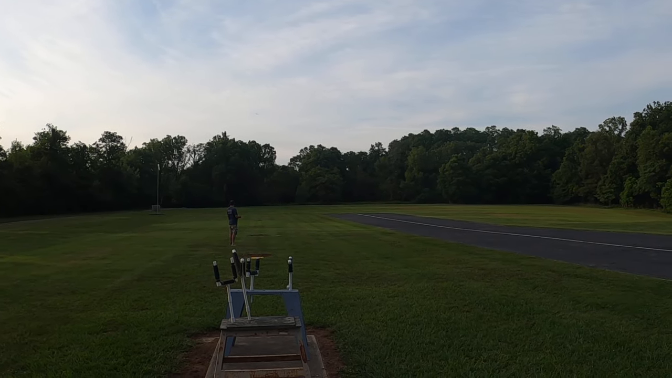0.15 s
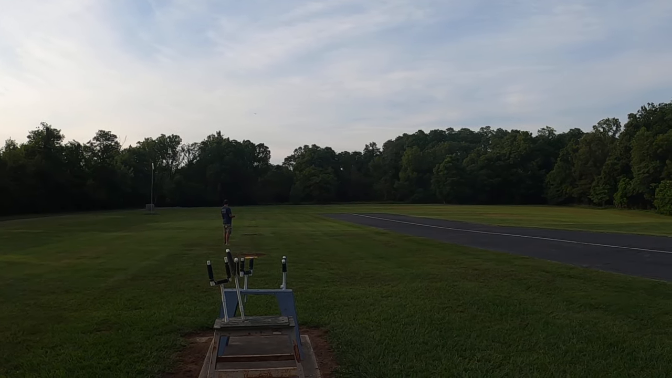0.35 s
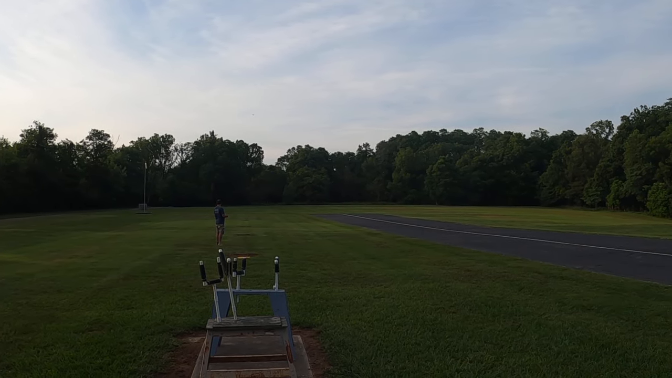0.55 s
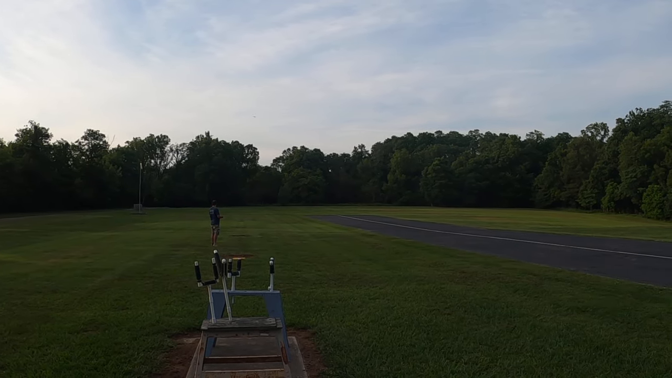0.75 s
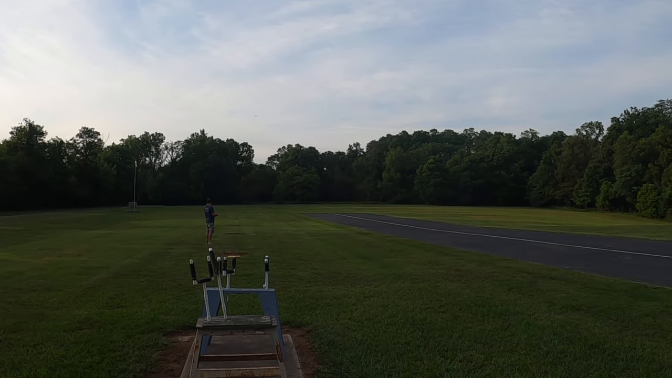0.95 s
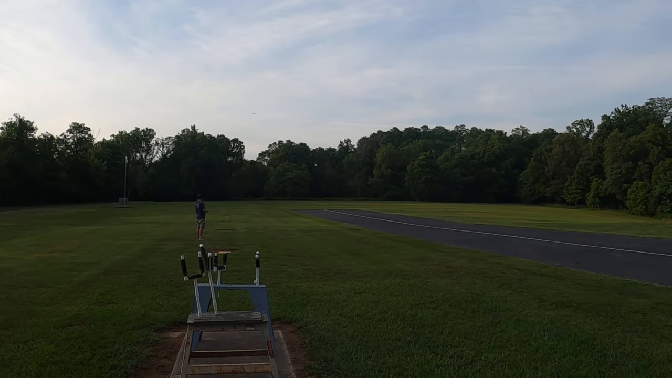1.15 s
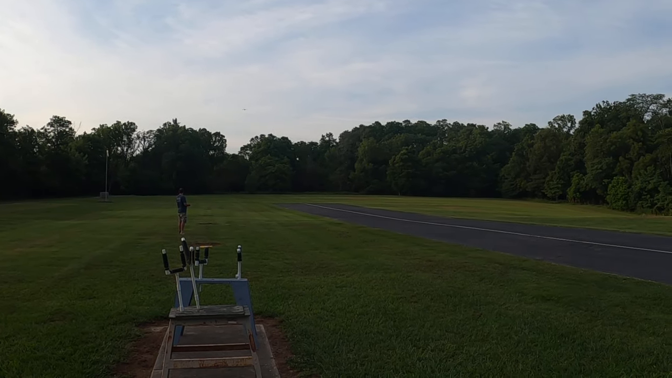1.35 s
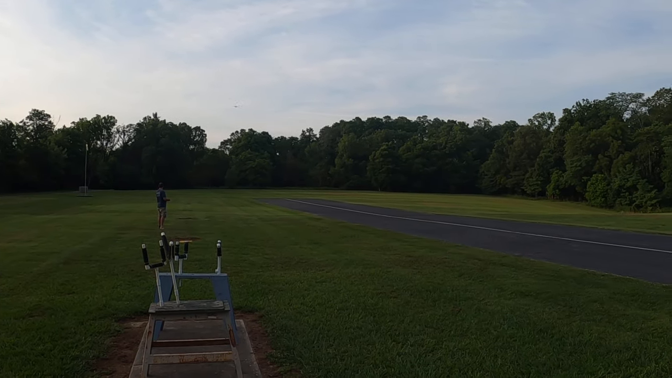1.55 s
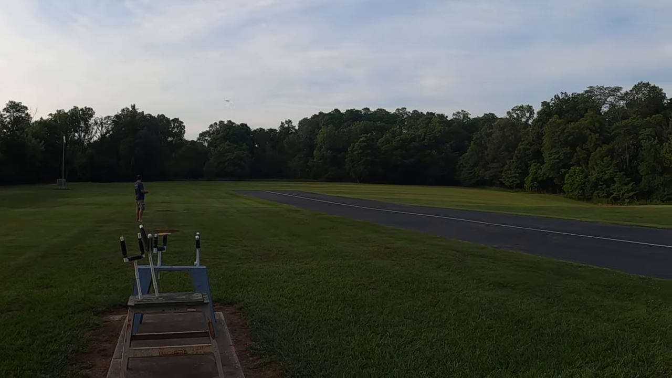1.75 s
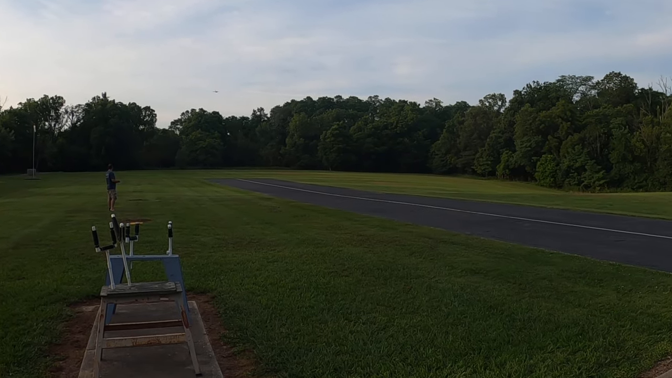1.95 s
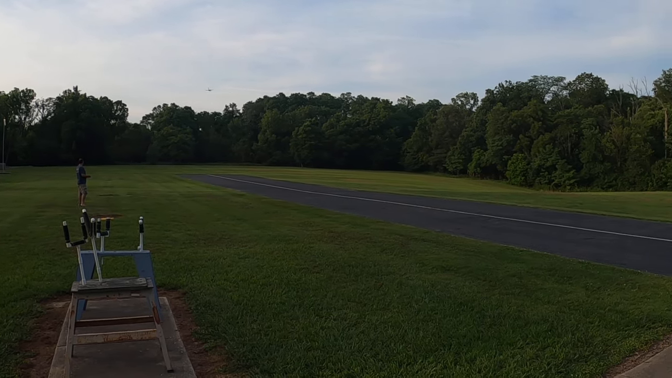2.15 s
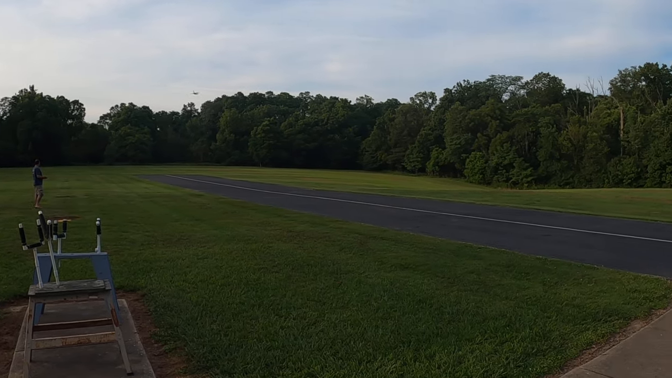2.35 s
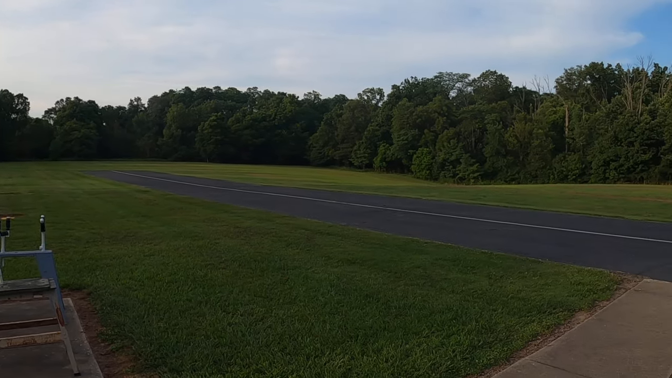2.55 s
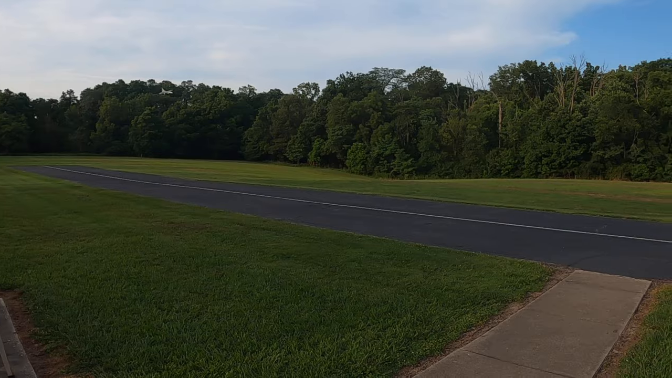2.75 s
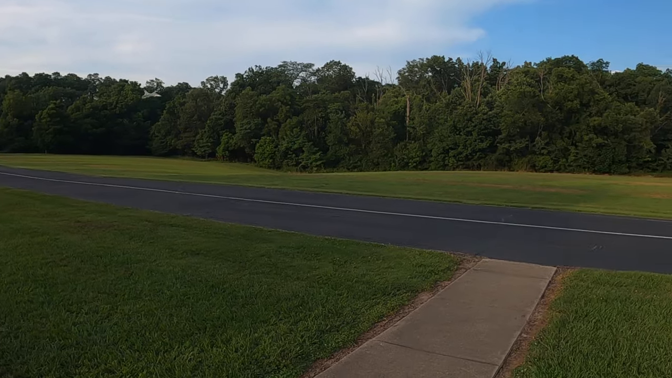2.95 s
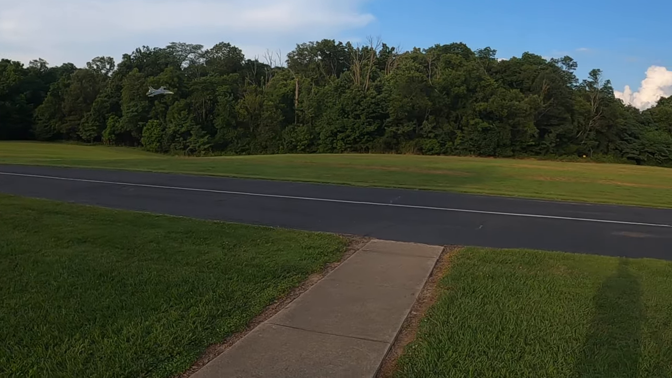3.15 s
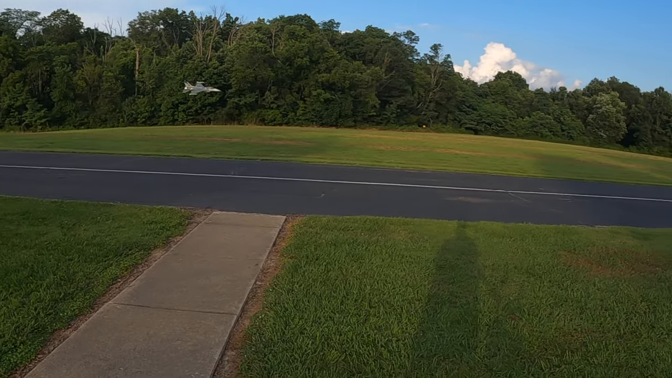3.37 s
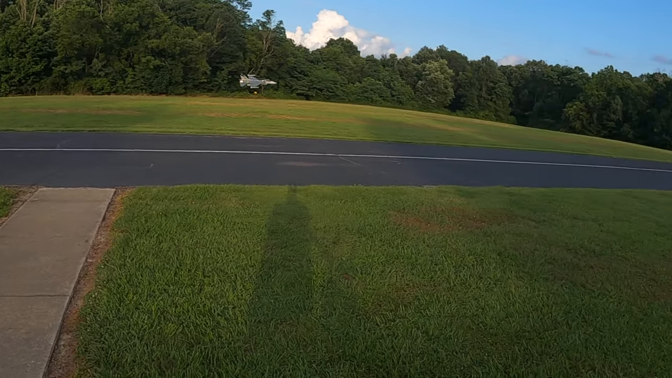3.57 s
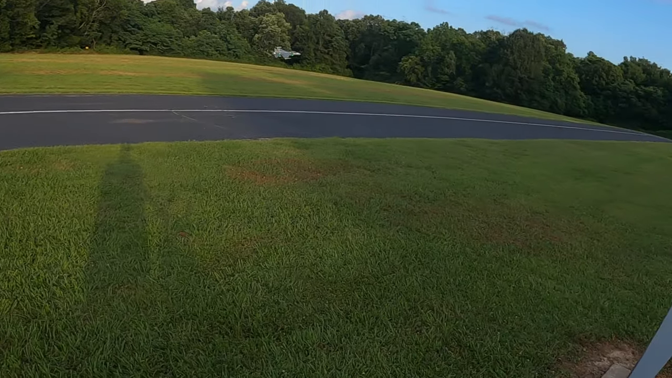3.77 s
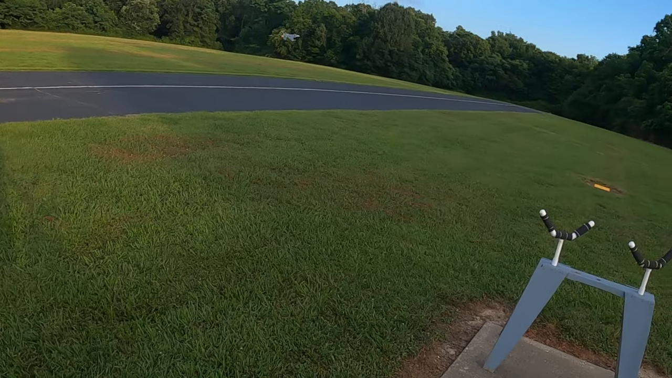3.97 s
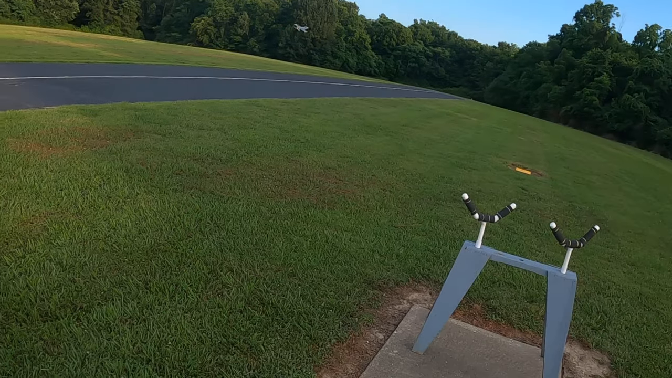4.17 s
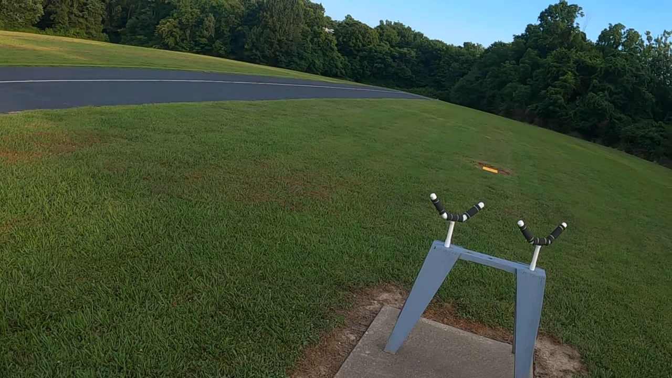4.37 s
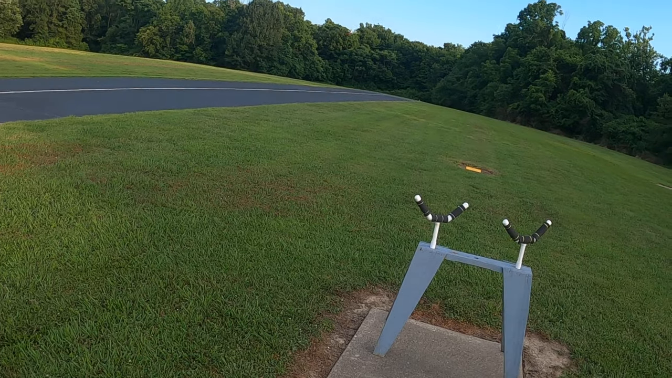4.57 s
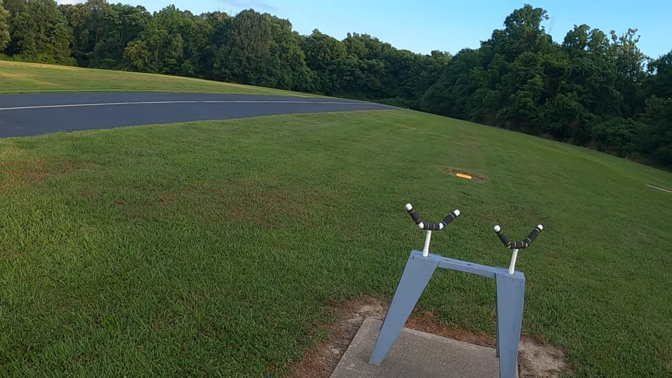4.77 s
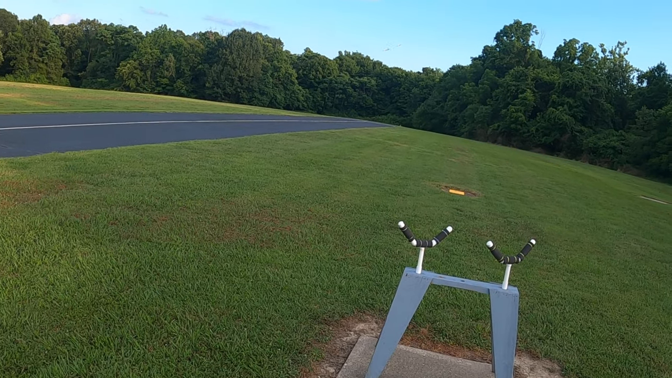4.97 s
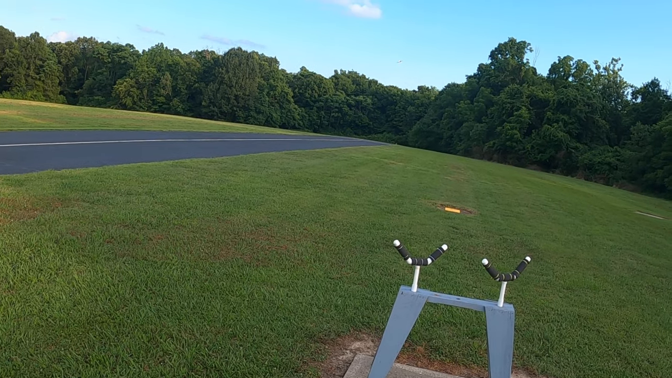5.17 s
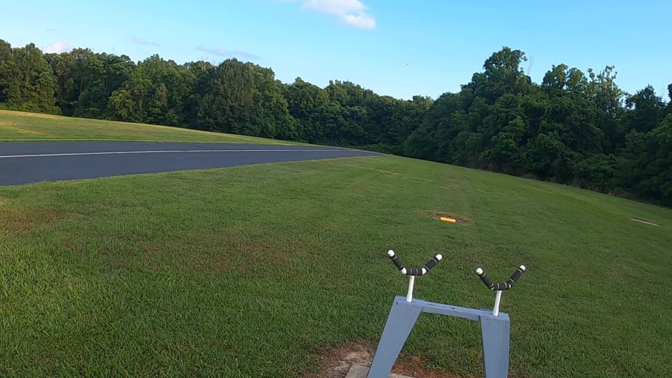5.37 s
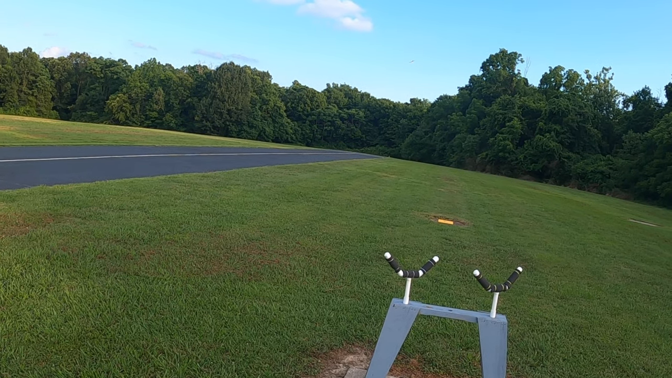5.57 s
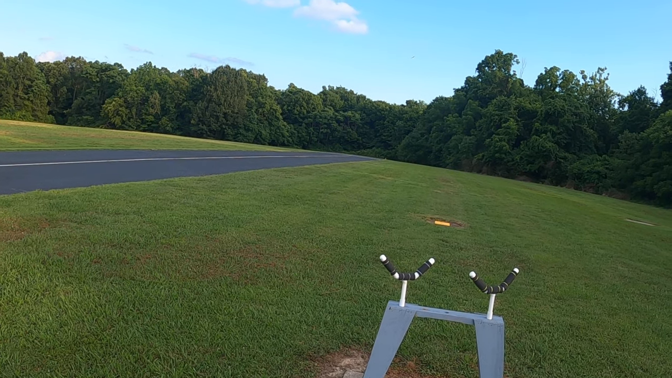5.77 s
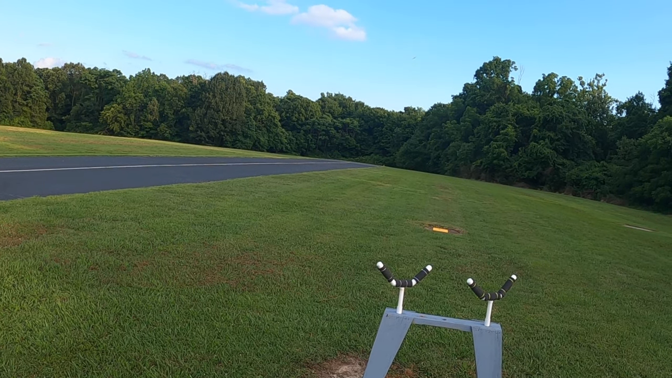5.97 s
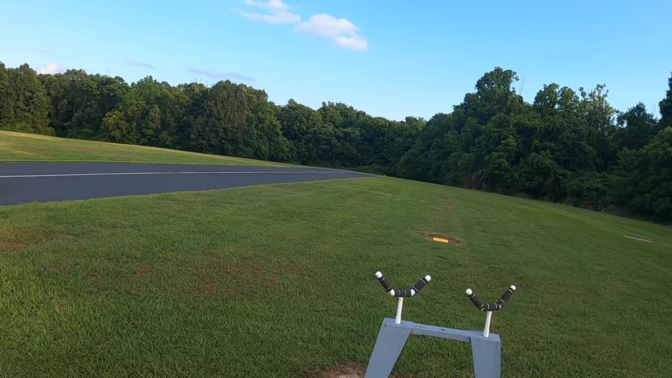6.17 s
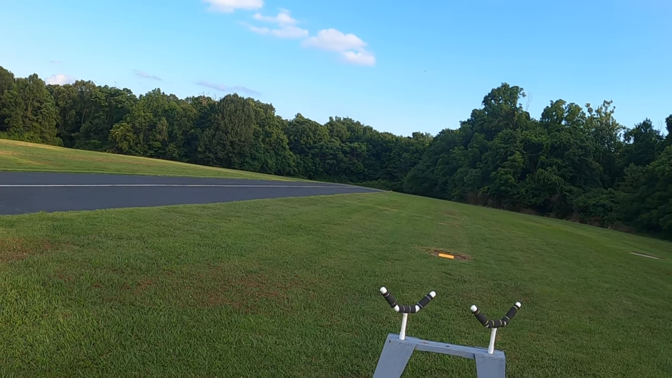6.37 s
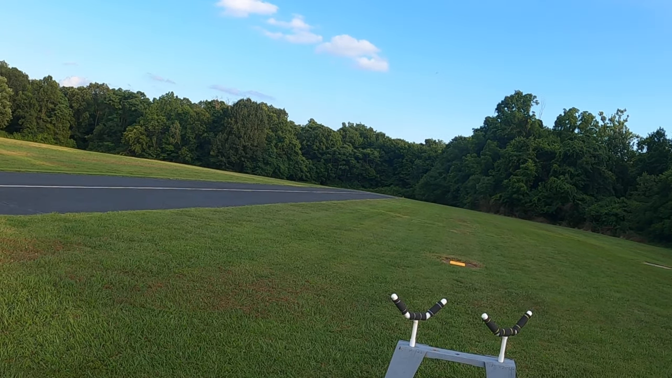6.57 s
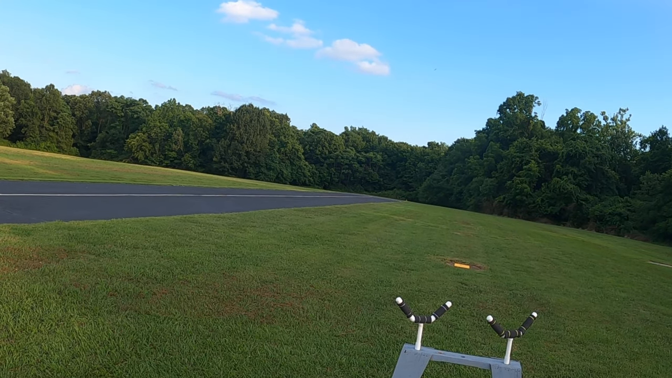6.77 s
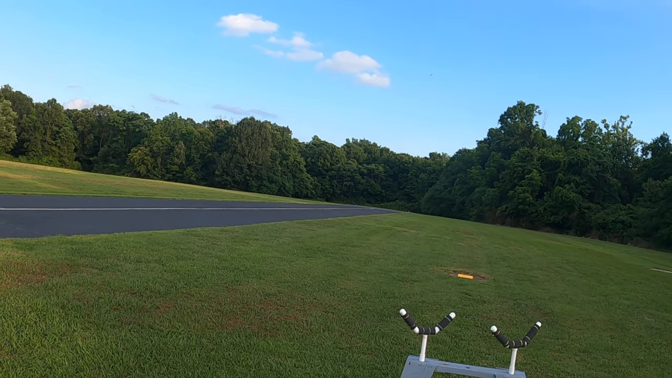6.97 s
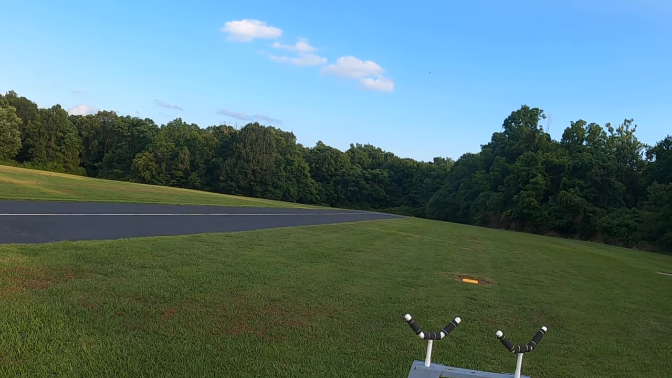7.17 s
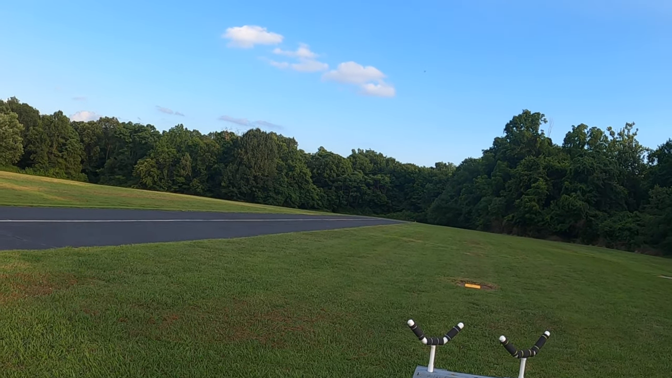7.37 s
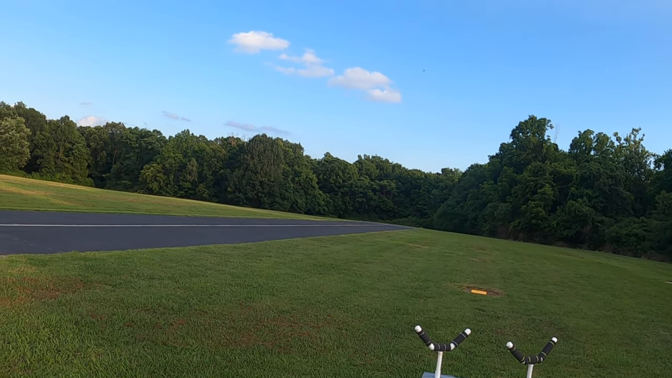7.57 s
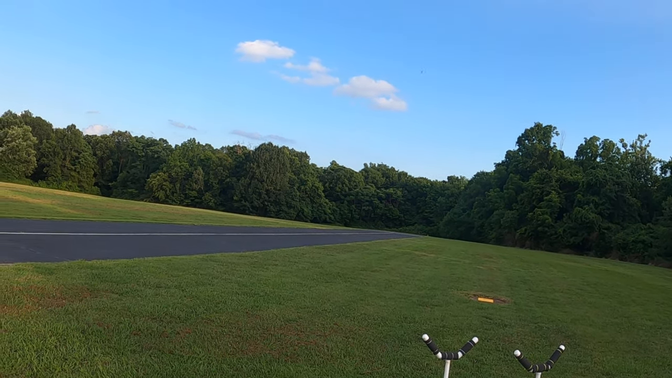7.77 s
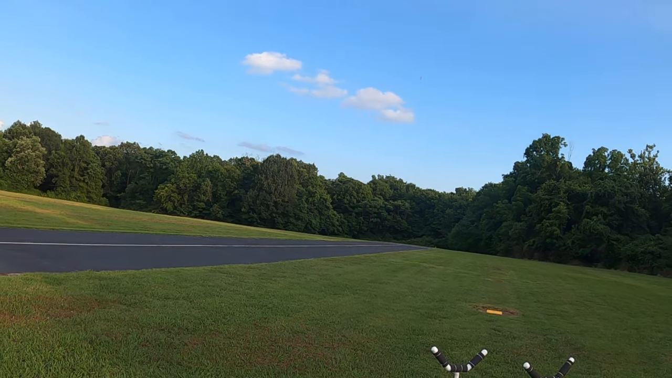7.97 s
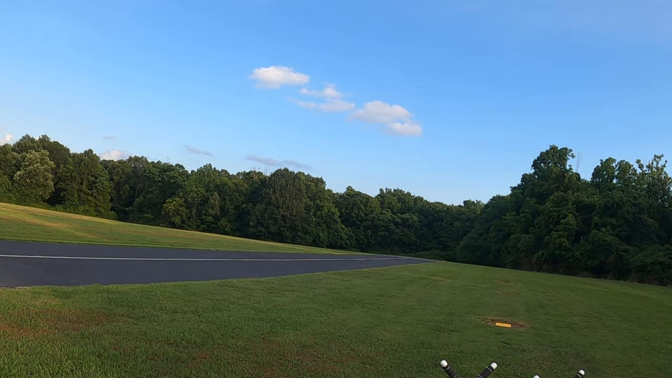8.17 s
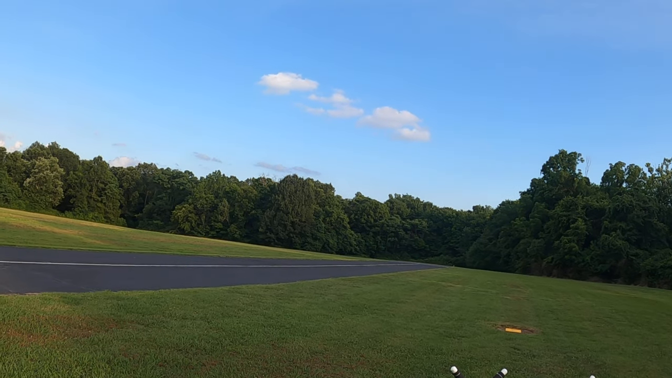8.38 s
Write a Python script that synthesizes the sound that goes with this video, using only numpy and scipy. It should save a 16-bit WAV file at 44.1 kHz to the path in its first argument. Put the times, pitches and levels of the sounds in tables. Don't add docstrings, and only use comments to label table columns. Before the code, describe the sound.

An open grass field, heard through a handheld stereo microphone, with low distant traffic and light wind buffeting. In the first half second a small electric fan spools up faintly, becoming a thin steady whine around 6.5 kHz that pulses in and out over soft, patchy air rush. A tiny bird chip sounds near 1.6 s. From about 2.8 s the jet closes fast: the whine sharpens, a lower shaft hum and hollow intake howl join, and the rush brightens. The pass peaks around 3.5-3.9 s, the whine sliding down towards 5 kHz while a hollow whistle sweeps through the hissing air. From 4 to 5 s it turns rougher and flutters away, fading almost completely by 6.3 s. A faint smeared whine and dull rush linger to 8.4 s, with wind thumps near 3.4, 5.5, 6.1 and 7.1 s and a faint low bird whistle at 7.6 s.

```python
import sys
import numpy as np
from scipy import signal
from scipy.fft import rfft, irfft, next_fast_len
from scipy.io import wavfile
from scipy.ndimage import map_coordinates

SR = 44100
rng = np.random.default_rng(int(sys.argv[2]) if len(sys.argv) > 2 else 0)


def magnitude_from_level(level_db):
    exponent = np.asarray(level_db, float) / 20
    return 10 ** exponent


def generate_wav(sig):
    pcm = np.round(np.clip(np.atleast_2d(sig).T, -1, 1) * 32767).astype(np.int16)
    wavfile.write(sys.argv[1], SR, pcm)


N = 371763

# time in seconds, level in dB, treble the air leaves in dB.
JET_DISTANCE = [(0, -51, -18.5), (.3, -48, -23.5), (.65, -42.5, -22.5), (1.5, -40, -26), (1.8, -37, -22),
                (2.35, -36.5, -13), (2.9, -32, -12.5), (3.5, -28.5, -9), (3.8, -29.5, -7), (4, -33, -4),
                (4.7, -34.5, -4.5), (5.25, -38, -10), (5.9, -39.5, -16.5), (6.3, -43, -16),
                (7.2, -44.5, -17.5), (7.8, -44, -20), (8.43, -48, -16)]
# time in seconds, treble gain in dB, half length in seconds.
CALM_POCKETS = [(1.176, 12, 0.38), (1.88, 7, 0.15), (2.907, 7, 0.036), (6.005, 7, 0.09), (6.35, 7.5, .05),
                (6.524, 3, 0.1), (6.908, 1, 0.13), (7.42, 4, .08), (4.608, 1.5, 0.034), (6.73, -3, 0.087),
                (8.15, -1, 0.077), (7.594, 3, 0.056), (7.862, 10.5, 0.13), (8.43, 10, 0.15)]
# frequency in Hz, density in dB per Hz.
RUSH_COLOUR = [(110, -5), (300, -9), (750, -3.5), (1000, -0.5), (1500, -3), (2300, -5.5), (2900, -7),
               (4500, -3.5), (5600, -2), (6800, -3.5), (7600, -13), (8400, -9.5), (10200, -19),
               (10900, -24), (12400, -26.5), (14000, -33), (15400, -58)]
# time in seconds, share of full fan speed from 0 to 1.
THROTTLE = [
    (.28, .83),
    (.45, .933),
    (.58, 1),
]
# time in seconds, level in dB rms.
WHINE_LEVEL = [(0, -72), (.3, -56), (.5, -55), (1.25, -40), (1.55, -51.5), (2.1, -39), (2.8, -39.5),
               (3.1, -26), (3.55, -26), (3.7, -19.5), (4.03, -24), (4.15, -35), (4.25, -26.5), (4.4, -33.5),
               (4.6, -30), (4.75, -36.5), (5.3, -36.5), (6.3, -58)]
# time in seconds, echo share from 0 to 1.
WHINE_NULLS = [(0, .3), (.3, .5), (.6, .4), (.9, .6), (1.43, .8), (1.63, .8), (2.01, .4), (2.28, .7),
               (2.5, .4), (2.78, .9), (2.86, .7), (2.93, .85), (3.18, .9), (3.35, .8), (3.455, .9),
               (3.525, .95), (3.625, .95), (3.74, .95), (3.85, .8), (4.085, .95), (4.225, .5), (4.32, .95),
               (4.52, .9), (4.72, .6), (4.95, .5), (5.2, .2), (5.85, .6), (6.12, .8), (6.3, .5)]
# time in seconds, lag in ms.
ECHO_LAG = [(.1, 1.85), (1.6, 1.85), (2.2, 1.72), (2.8, 1.6), (3.2, 1.44), (3.5, 1.15), (3.8, .7),
            (3.92, .61), (4.2, .58), (4.4, .76), (4.7, 1.04), (5, 1.29), (5.4, 1.58), (6, 1.96),
            (6.5, 2.25), (7.25, 2.6), (8, 2.98), (8.4, 3.2)]
# frequency in Hz, likeness from 0 to 1, left-right in dB, left lead in radians.
PORT_RESPONSE = [(98, 0.65, -4, 0), (288, 1, 2, -0.26), (1290, 0.8, -1, 0), (3780, 1, 3, -.5),
                 (6370, 0.88, -1, -0.7), (7520, 0.87, 5.5, -2), (8000, 1, -7.5, -0.5),
                 (13000, 1, -10, -1.5), (15500, .3, -35, 18)]
# time in seconds, left-right in dB, left lag in samples.
CAMERA_TURN = [(0, 1.5, 0.76), (1, 2, 0.49), (3.3, 2.5, .2), (4.3, 1, 0.27), (5.3, -1, 1.22),
               (6.2, -1.3, 1.27), (8.43, -1, 1.27)]
# frequency in Hz, density in dB per Hz.
WIND_TONE = [(8.8, -33), (15, 4), (38, 4), (55, 3), (99, -7), (231, -34.5), (400, -46), (520, -81),
             (880, -120)]
# time in seconds, level in dB, left-right in dB, half length in seconds.
GUST_SWELLS = [(0, -43, 8, 0.033), (0.65, -37.5, 9, 0.057), (0.904, -38.5, -3, 0.052),
               (1.302, -33, -2, 0.024), (1.5, -42, 2, .2), (1.977, -35, -2, 0.089), (2.15, -43, -1, 0.16),
               (2.578, -44.5, 5, 0.075), (3.007, -43, 12, .04), (3.29, -35, 20, 0.044),
               (3.438, -26.5, 13, .05), (3.56, -33, 18, 0.054), (3.79, -36, 23, 0.044),
               (3.98, -37.5, -4, 0.029), (4.302, -33.5, -4, 0.038), (4.5, -44.5, -12, 0.11),
               (5.393, -43, -16, 0.046), (5.558, -31.5, -20, 0.057), (5.99, -36, -8, 0.055),
               (6.09, -31.5, -3, 0.047), (6.298, -43, -2, 0.087), (6.577, -34, 12, 0.083),
               (7.117, -38.5, -2, .12), (7.3, -42, 10, 0.1), (7.516, -39, 0, 0.054),
               (7.68, -37.5, 9, 0.058), (8.05, -45, -2, 0.21)]
# start in seconds, peak in dB, left-right in dB, frequency in Hz.
GUST_THUMPS = [(3.276, -20, 17, 80), (3.432, -23, 8, 43.1), (5.368, -26.5, -16, 43.1),
               (5.507, -25, -15, 68), (5.963, -32, -13.5, 110), (6.082, -23, 8, 81), (6.101, -19, -27, 55),
               (6.488, -38.5, 13.5, 73.6), (6.642, -37, 3, 79.4), (7.076, -21.5, -26, 60),
               (7.668, -29, 16, 86.5)]
# frequency in Hz, density in dB per Hz.
FIELD_COLOUR = [(29, -15), (50, 6.5), (176, -14.5), (255, -11.5), (420, -14), (773, -23.5), (1360, -5.5),
                (3240, -27), (5460, -24), (9000, -59), (11700, -81), (19800, -120)]
# start in seconds, length in seconds, start in Hz, end in Hz, level in dB, half the left-
# right difference in dB.
BIRD_NOTES = [
    (.02, 0.14, 4470, 4400, -58, 2),
    (1.575, 0.033, 4240, 4120, -43, 5),
    (7.268, .04, 4200, 4200, -54, 9),
    (7.62, 0.28, 2590, 2490, -54.5, 11),
]

BLADES, POLE_PAIRS = 11, 7
ABEAM_S, ABEAM_SPREAD_S = 3.72, .455


def clock():
    return np.arange(N) / SR


def in_time(rows):
    s, *columns = np.transpose(rows)
    return [np.interp(clock(), s, c) for c in columns]


def at_hz(rows, hz, order=1):
    rows = np.array(rows)
    return np.interp(np.log(hz + 1), np.log(rows[:, 0]), rows[:, order])


def rms_one(x):
    return x / np.sqrt(np.mean(x ** 2) + 1e-20)


def shaped(x, response):
    size = next_fast_len(N + 4096)
    hz = np.arange(size // 2 + 1) * SR / size
    return irfft(rfft(x, size) * response(hz), size)[..., :N]


def band(x, low_hz, high_hz):
    return signal.sosfilt(signal.butter(2, [low_hz, high_hz], "band", fs=SR, output="sos"), x)


def delayed(x, lag):
    read_at = [np.arange(N) - lag]
    return np.array([map_coordinates(c, read_at, order=3, mode="nearest") for c in np.atleast_2d(x)])


def drift(rate_hz):
    r = np.exp(-2 * np.pi * rate_hz * 40 / SR)
    noise = rng.standard_normal(N // 40 + 2002)
    slow = signal.lfilter([1], [1, -2 * r, r * r], noise)[2000:]
    return np.interp(np.arange(N) / 40, np.arange(len(slow)), rms_one(slow))


def noisy_line(phase, width_hz):
    low_pass = signal.butter(2, width_hz / 2, fs=SR, output="sos")
    slow = signal.sosfilt(low_pass, rng.standard_normal((2, 2, N)))
    return rms_one(slow[0] * np.sin(phase) + slow[1] * np.cos(phase))


def bump(s, half_s):
    return np.exp(-((clock() - s) / half_s) ** 2)


def beam(s, peak_db, rise, fall, floor_db):
    late = clock() - s
    return magnitude_from_level(peak_db + np.minimum(rise * late, -fall * late)) + magnitude_from_level(floor_db)


def split(pan_db):
    return 2 * np.array([magnitude_from_level(pan_db), np.ones_like(pan_db)]) / np.sqrt(1 + magnitude_from_level(pan_db) ** 2)


def astern():
    along = (clock() - ABEAM_S) / ABEAM_SPREAD_S
    return .5 + .5 * along / np.sqrt(1 + along ** 2)


def clear_db():
    return sum(gain_db * bump(s, half_s) for s, gain_db, half_s in CALM_POCKETS)


def layers_db():
    level_db, treble_db = in_time(JET_DISTANCE)
    calm_db = clear_db()
    roar_db = level_db - 0.11 * calm_db
    whoosh_db = -1.5 + 0.25 * treble_db + 6 * astern() + 0.65 * calm_db
    return roar_db, whoosh_db, treble_db + calm_db


def rush(patchy_db):
    roar_db, whoosh_db, hiss_db = layers_db()
    together = drift(9.7)
    edges = 60 * 2 ** np.arange(0, 8.4, .5)
    white = rng.standard_normal((2, 2, N))
    out = 0
    for k, (low, high) in enumerate(zip(edges, edges[1:])):
        hz = np.sqrt(low * high)
        hissy = np.clip(np.log2(hz / 4000) / 1.02, 0, 1.55)
        whooshy = np.clip(np.log2(hz / 1200), 0, 1) * max(1 - hissy, 0)
        tilt_db = whooshy * (whoosh_db + 1.5) + hissy * (hiss_db + 10.5)
        flicker_db = patchy_db * (together * (0.13 * hissy + 0.83) + 0.81 * drift(5.3))
        out = out + magnitude_from_level(roar_db + tilt_db + flicker_db) * band(white[k % 2], low, high)
    return magnitude_from_level(10) * shaped(out, lambda hz: magnitude_from_level(at_hz(RUSH_COLOUR, hz)))


def blade_hz():
    steady_hz = 5684 + 26.7 * (clock() - ABEAM_S)
    mach = .1478
    return in_time(THROTTLE)[0] * steady_hz / (1 + mach * (2 * astern() - 1))


def swell():
    s, share = np.transpose(WHINE_NULLS)
    slip = np.interp(clock(), s, np.arange(len(s)))
    share = np.clip(np.interp(clock(), s, share), 0, 1)
    both = np.abs(1 - share * np.exp(2j * np.pi * slip)) / (1 + share)
    sounding = (clock() > s[0]) * (clock() < s[-1])
    return magnitude_from_level(in_time(WHINE_LEVEL)[0]) * both ** .7 * sounding


def fan():
    roar_db, whoosh_db, hiss_db = layers_db()
    turns = 2 * np.pi * np.cumsum(blade_hz()) / SR / BLADES
    whine = swell()
    tone = whine * np.sin(BLADES * turns + 0.3 * drift(40))
    octave = beam(3.85, -53, rise=22, fall=13, floor_db=-99) * noisy_line(2 * BLADES * turns, width_hz=62)[0]
    shaft_beam = beam(3.3, -35, rise=20, fall=150, floor_db=-67)
    shaft = shaft_beam * magnitude_from_level(2.0 * drift(5)) * np.sin(turns + .4 * drift(8))
    motor = beam(3.55, -41, rise=17, fall=110, floor_db=-85) * noisy_line(POLE_PAIRS * turns, width_hz=77)[0]

    boom_intake = beam(3.1, -42, rise=40, fall=30, floor_db=-66)
    boom_side = beam(3.65, -38, rise=70, fall=28, floor_db=-80)
    boom = (boom_intake + boom_side) * noisy_line(.6 * turns, width_hz=65)[0]

    howl_db = roar_db - 9.5 - 14 * astern() + 6.5 * bump(3.23, 0.15)
    howl = magnitude_from_level(howl_db) * noisy_line(4.3 * turns, width_hz=300)[0]
    exhaust_rumble = rms_one(band(rng.standard_normal(N), 160, 230))
    efflux = beam(3.5, -41, rise=70, fall=26, floor_db=-80) * exhaust_rumble

    blur_beam = np.minimum(beam(4.2, 1.5, rise=3.0, fall=40, floor_db=-22), 1.1)
    blur = magnitude_from_level(roar_db + whoosh_db) * blur_beam * noisy_line(BLADES * turns, width_hz=650)
    wake_beam = beam(4.22, 1.0, rise=55, fall=22, floor_db=-60)
    blur = blur + whine * wake_beam * noisy_line(BLADES * turns, width_hz=400)
    return howl + efflux + np.sqrt(2) * (tone + octave) + shaft + motor + boom, blur


def ground_echo(x):
    dull = np.interp(clock(), (3.3, 3.72, 4.1, 4.75), [1, 0, 0, 1])
    paving_turn, grass_turn, grazing_turn = 1.15, -2.2, -1.15
    grass_turn = grazing_turn + (grass_turn - grazing_turn) * bump(ABEAM_S, 1.7)
    turn = paving_turn + (grass_turn - paving_turn) * np.minimum(dull / .35, 1)
    lag_ms = in_time(ECHO_LAG)[0] + .007 * drift(7)
    edge_scatter = .55 * 4 * dull * (1 - dull)
    strength = (dull * .66 + (1 - dull) * .6) * (1 - edge_scatter)
    strength = strength + .45 * bump(4.85, .32)
    late = strength * delayed(x, lag_ms * SR / 1000)
    off_grass = shaped(late, lambda hz: 1 / np.sqrt(1 + (hz / 3500) ** 4))
    off_paving = shaped(late, lambda hz: 1 / np.sqrt(1 + (hz / 8000) ** 4))
    late = dull * off_grass + (1 - dull) * off_paving
    upper = shaped(late, lambda hz: 1 / (1 + (200 / (hz + 1)) ** 2))
    quarter_turned = shaped(upper, lambda hz: 1j + 0 * hz)
    return late + (np.cos(turn) - 1) * upper + np.sin(turn) * quarter_turned


def ports(shared, other):
    pan_db, lag = in_time(CAMERA_TURN)

    def alike(hz):
        return np.clip(at_hz(PORT_RESPONSE, hz), 0, 1)

    def left_response(hz):
        balance_db, lead = at_hz(PORT_RESPONSE, hz, order=2), at_hz(PORT_RESPONSE, hz, order=3)
        return magnitude_from_level(balance_db) * np.exp(1j * lead)

    right = shaped(shared, alike) + shaped(other, lambda hz: np.sqrt(1 - alike(hz) ** 2))
    left = shaped(shared, left_response)
    return np.array([magnitude_from_level(pan_db / 2) * delayed(left, lag)[0], magnitude_from_level(-pan_db / 2) * right])


def gusts():
    power = (magnitude_from_level(-56.5) * split(np.full(N, 9.0))) ** 2
    for s, level_db, pan_db, half_s in GUST_SWELLS:
        power = power + (magnitude_from_level(level_db) * split(np.array([1. * pan_db]))) ** 2 * bump(s, half_s)
    return np.sqrt(power)


def wind():
    low = rms_one(shaped(rng.standard_normal((2, N)), lambda hz: magnitude_from_level(at_hz(WIND_TONE, hz))))
    lumps = magnitude_from_level(2.7 * np.array([drift(18.0), drift(4.7)]))
    out = lumps * gusts() * low
    t = np.arange(int(.07 * SR)) / SR
    for s, peak_db, side_db, hz in GUST_THUMPS:
        swing = 2 * np.pi * hz * t
        envelope = (t / 0.013) * np.exp(1 - t / 0.0091)
        push = np.sin(swing + 0.86 * np.sin(swing)) * envelope
        at = int(s * SR)
        out[:, at:at + len(t)] += magnitude_from_level(peak_db + 4.0) * split(np.array([side_db])) * push / 1.54
    return out


def field():
    noise = rng.standard_normal((2, N))
    shared, other = rms_one(shaped(noise, lambda hz: magnitude_from_level(at_hz(FIELD_COLOUR, hz))))
    heavy_vehicle = beam(0.48, -47.5, rise=7, fall=14, floor_db=-99)
    rumble = (magnitude_from_level(-52) + heavy_vehicle) * rms_one(band(rng.standard_normal(N), 63, 119.5))
    level = magnitude_from_level(-43.5 + 2.0 * drift(0.22))
    return level * (0.68 * shared + 0.26 * other * [[1], [-1]]) + rumble


def birds():
    out = np.zeros((2, N))
    for s, length, start_hz, end_hz, level_db, side_db in BIRD_NOTES:
        hz = np.linspace(start_hz, end_hz, int(length * SR))
        note = np.sin(2 * np.pi * np.cumsum(hz) / SR) * np.sqrt(np.hanning(len(hz)))
        at = int(s * SR)
        out[:, at:at + len(hz)] += magnitude_from_level(level_db) * note * magnitude_from_level([[side_db], [-side_db]])
    return out


def far_whine():
    narrow = band(band(rng.standard_normal((2, N)), 5100, 5360), 5100, 5360)
    fade_in = np.clip((clock() - 5.9) / 0.37, 0, 1)
    return magnitude_from_level(-55.5 + 1.32 * clear_db()) * fade_in * rms_one(narrow)


def scene():
    clean, blur = fan()
    air = rush(patchy_db=1.37) + blur
    shared, other = air + ground_echo(air) + far_whine()
    return ports(shared + clean, other) + wind() + field() + birds()


def band_limit(x):
    return signal.sosfilt(signal.butter(12, 15600, fs=SR, output="sos"), x)


def record(dry):
    return band_limit(dry)


dry = scene()
out = record(dry)
generate_wav(out)
```